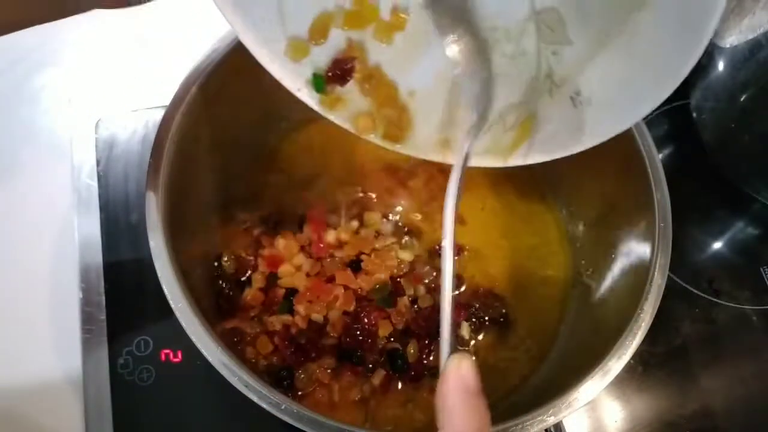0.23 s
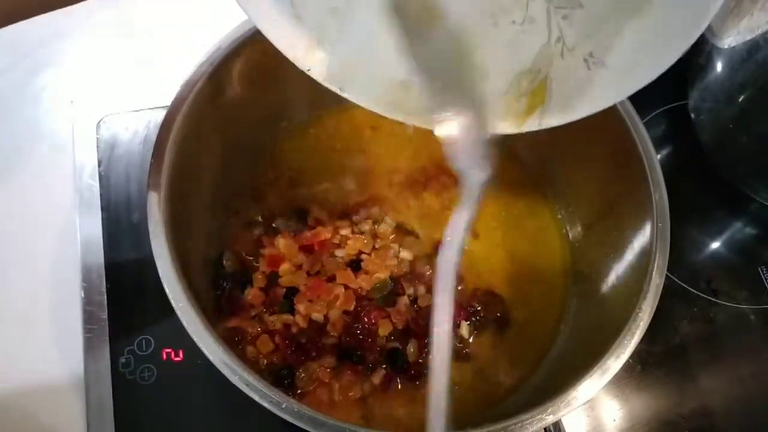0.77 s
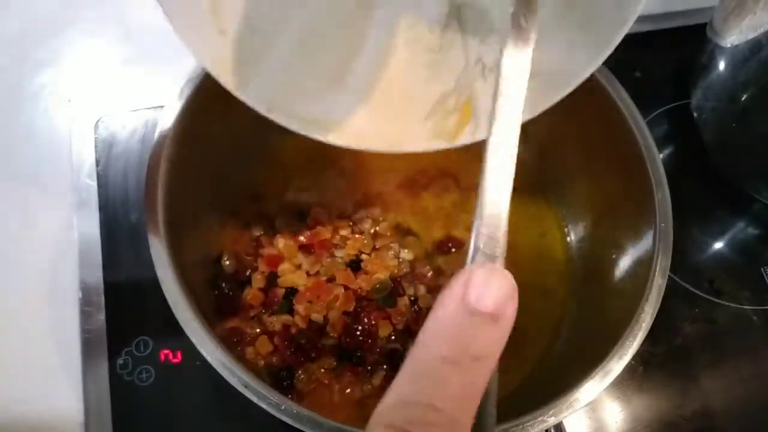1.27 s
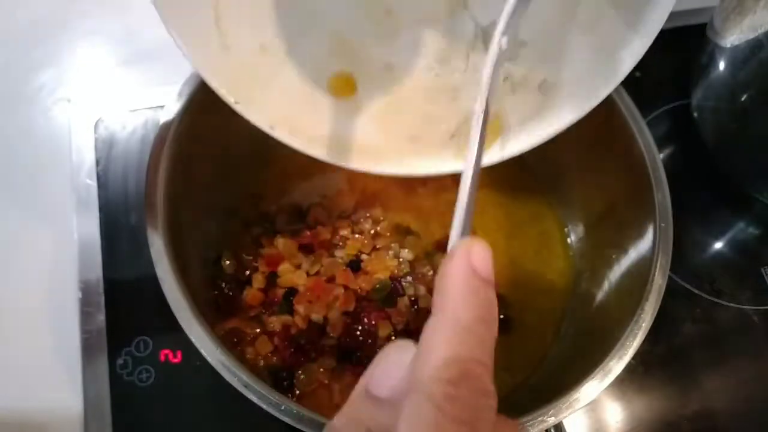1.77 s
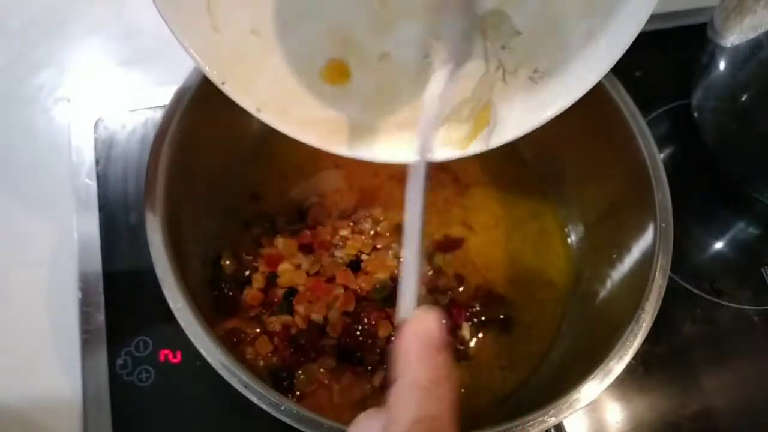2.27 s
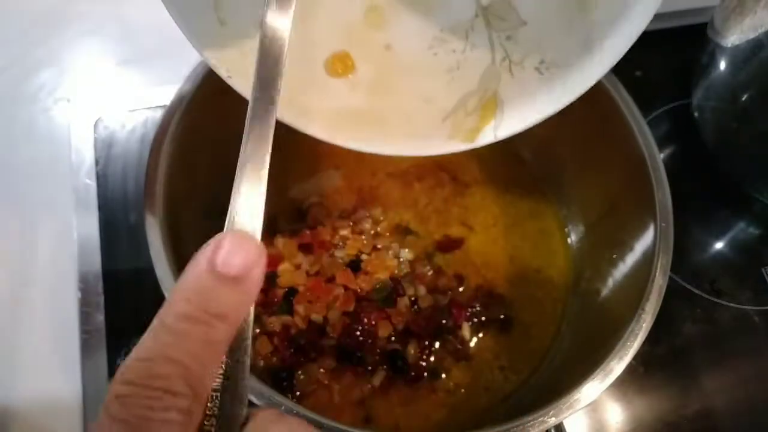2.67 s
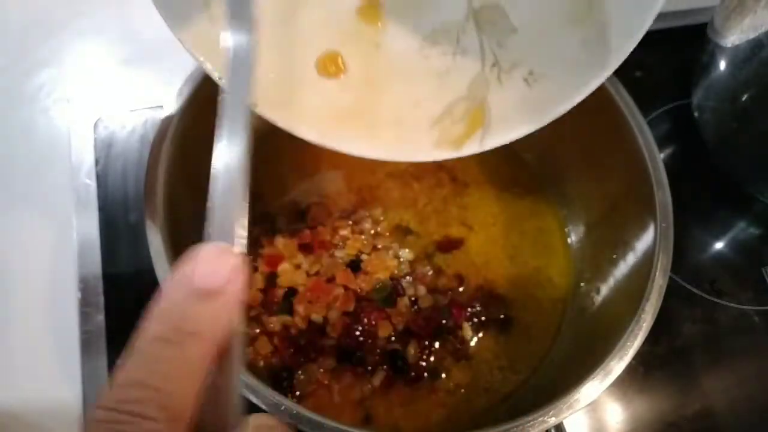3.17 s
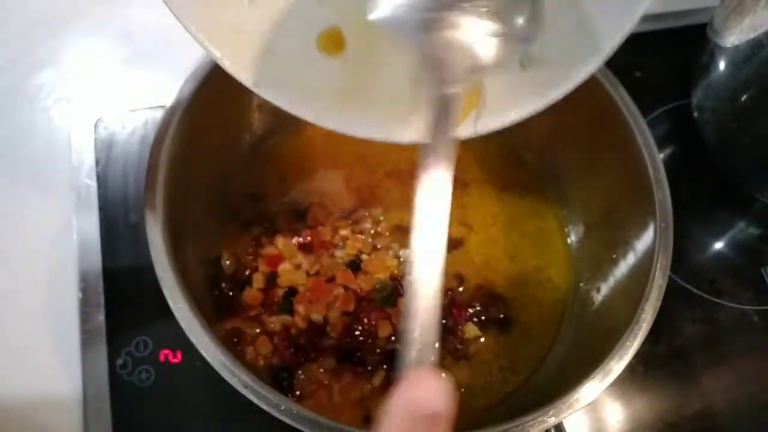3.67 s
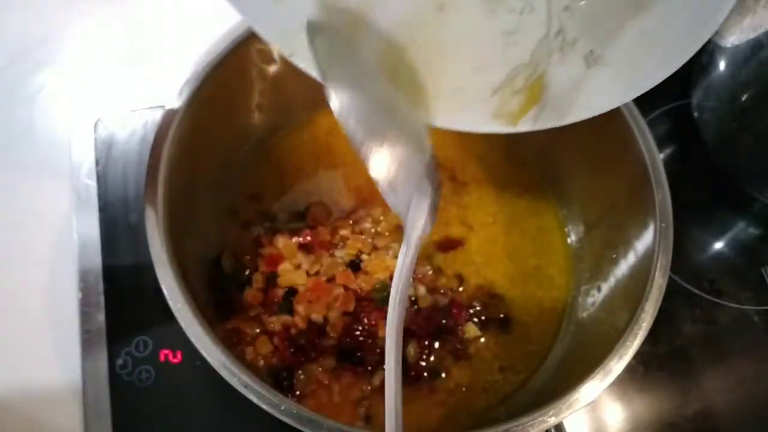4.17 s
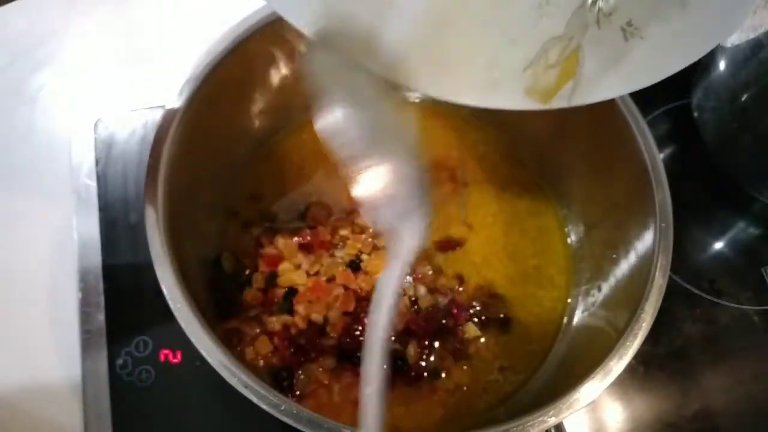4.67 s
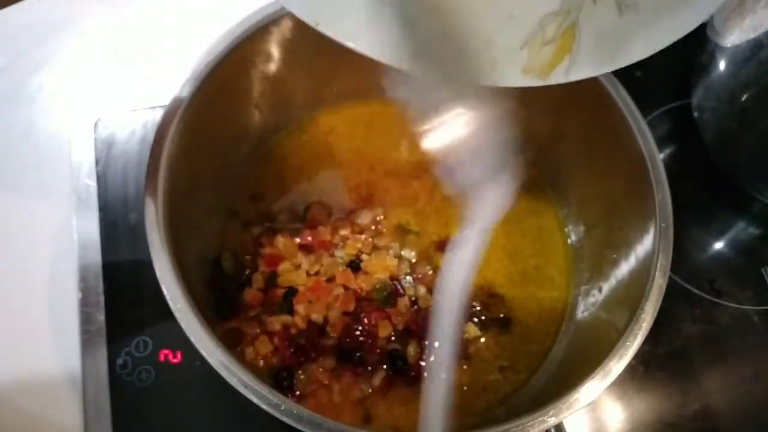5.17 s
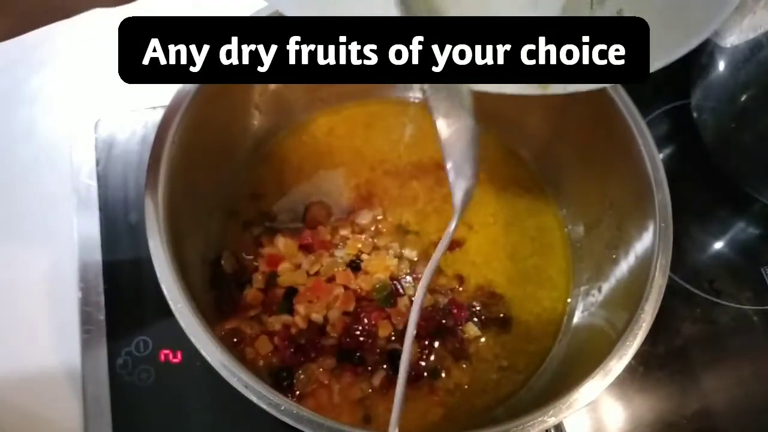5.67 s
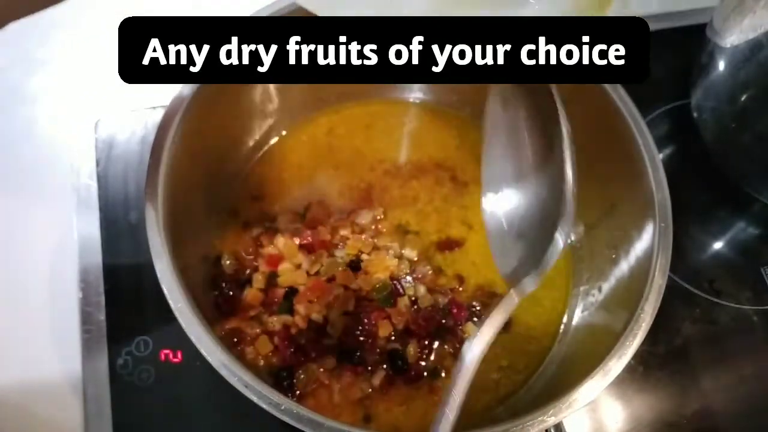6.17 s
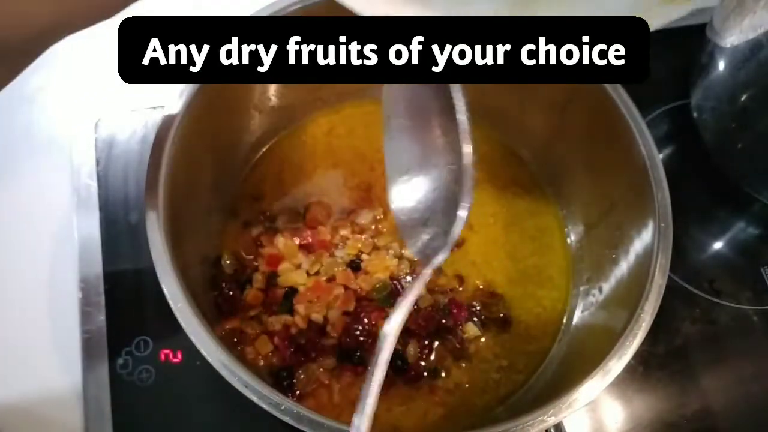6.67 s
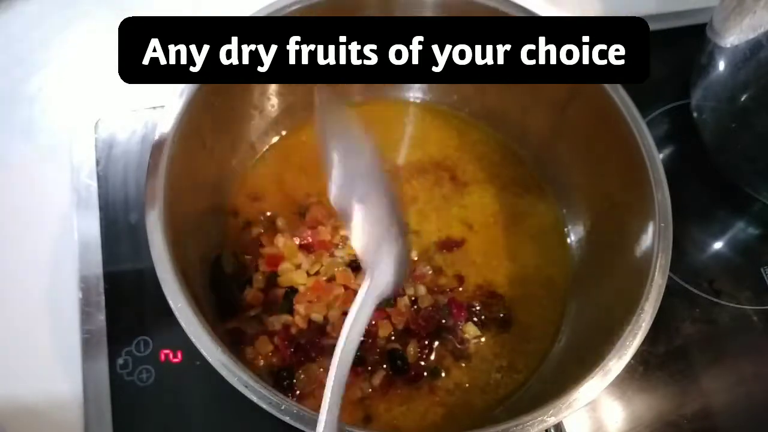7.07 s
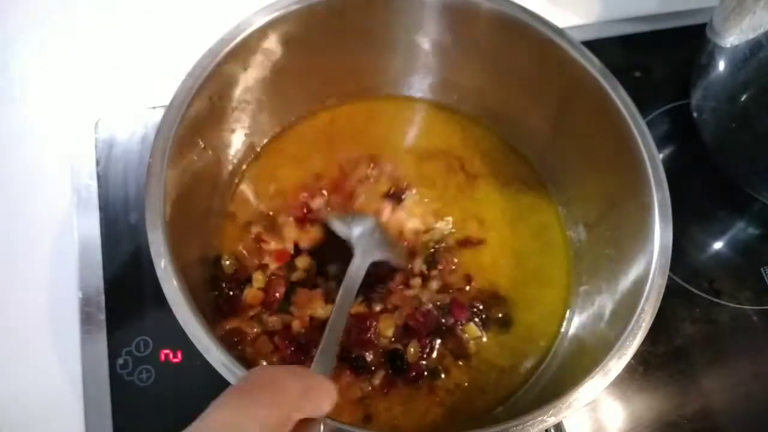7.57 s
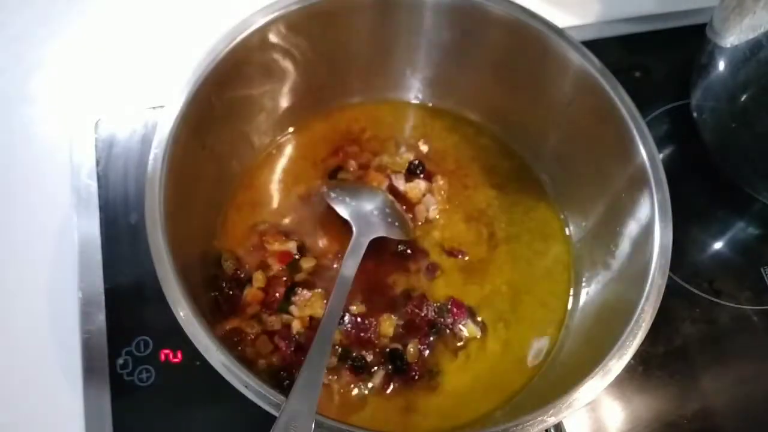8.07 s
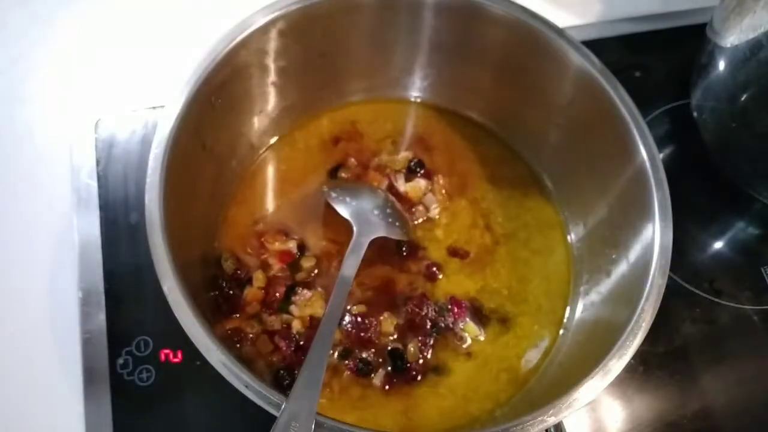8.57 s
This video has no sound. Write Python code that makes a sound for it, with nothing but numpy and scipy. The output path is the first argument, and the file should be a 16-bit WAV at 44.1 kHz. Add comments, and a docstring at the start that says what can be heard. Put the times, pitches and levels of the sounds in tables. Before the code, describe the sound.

A phone close to a stove picks up irregular spoon-on-bowl contacts: hard, short rim knocks, brighter tip clinks, quick rasping drags and tiny squeaks, with faint sticky fruit slips. Activity is busiest up to about four seconds, clusters again around five to six, then fades to faint drags. A single steel pan bump comes near the end, leaving only the soft fan rush in a lightly reverberant kitchen.

```python
"""Handle knocks on a bowl's rim stand out first, then tip clinks, short scrapes, squeaks and one pan bump.
A steel spoon scrapes dried fruit from a ceramic bowl into a saucepan, close under a phone in a small kitchen.
Contacts are cracks driving ringing modes; drags are trains of small slips; squeaks, thuds and hum are sines.
A noise tail makes the kitchen; shaped noise and wavering tones make the hob's fan, which runs throughout."""
import sys
import numpy as np
from scipy import signal
from scipy.fft import rfft, irfft
from scipy.io import wavfile
from scipy.ndimage import uniform_filter1d

SR = 44100
rng = np.random.default_rng(int(sys.argv[2]) if len(sys.argv) > 2 else 0)


def digitize_waveform(pressure):
    """Quantize a signal to 16-bit integers and store it at the path in sys.argv[1].

    Rows of a 2-D input are taken as channels; values are limited to [-1, 1].
    """
    field = np.atleast_2d(pressure).T
    bounded = np.clip(field, -1, 1)
    quanta = np.round(bounded * 32767).astype(np.int16)
    wavfile.write(sys.argv[1], SR, quanta)


N = 389401
TIME = np.arange(N) / SR


def undb(db):
    """Decibels to an amplitude factor."""
    return 10 ** (np.asarray(db) / 20)


def rms(x):
    """Effective level, kept just above zero."""
    return np.sqrt(np.mean(x ** 2) + 1e-20)


def read(points, hz):
    """A curve's value, on straight lines over log frequency."""
    f, v = np.transpose(points)
    return np.interp(np.log(np.maximum(hz, 1)), np.log(f), v)


def colour(x, points, size=4096):
    """Causal (minimum-phase) filter with the given (f/Hz, level/dB) response."""
    log_gain = np.log(undb(read(points, np.fft.rfftfreq(size, 1 / SR))))
    cepstrum = irfft(log_gain)
    # folding the cepstrum onto positive time makes the phase minimal
    cepstrum[1:size // 2] *= 2
    cepstrum[size // 2 + 1:] = 0
    response = irfft(np.exp(rfft(cepstrum)))
    return signal.fftconvolve(x, response[None], axes=-1)[:, :x.shape[-1]]


def band(x, lo, hi, order=4):
    """Band-pass between two frequencies in Hz."""
    sos = signal.butter(order, [lo, min(hi, .49 * SR)], "band", fs=SR, output="sos")
    return signal.sosfilt(sos, x)


def fade(t, t60):
    """Exponential decay that falls 60 dB in t60 seconds."""
    return undb(-60 * t / t60)


def walk(rate, count):
    """Smooth chance with a spread near 1, drawn anew about rate times a second."""
    hold = max(int(SR / rate), 1)
    steps = np.repeat(rng.standard_normal(count // hold + 1), hold)
    return uniform_filter1d(steps, hold)[:count] * np.sqrt(3 / 2)


def add(out, s, x):
    """Mix x into out from time s on."""
    i = max(int(s * SR), 0)
    out[:, i:i + x.shape[1]] += x[:, :N - i]


# The fan's rush of air: relative spectrum (f/Hz, level/dB)
FAN_AIR = [(20, 1.5), (45, -4), (75, -6.5), (105, -7.5), (135, -6.5), (200, -14.5), (270, -16.5),
           (500, -17), (800, -21), (1400, -28.5), (2400, -35), (3200, -49.5), (5000, -54.5), (16000, -55.5)]
# Faint steady tones of the fan (mean f/Hz, mean level/dB)
FAN_TONES = [(146, -72), (267, -74.5), (443, -78.5), (492, -80)]
# Swells of the hum (t/s of the crest, rise above rest level/dB)
HUM_SWELLS = [(0, 2.5), (2.8, 9.5), (7.9, 7.5)]
AIR_DB = -59.5
HUM_DB, HUM_SWELL_S = -66.5, 0.61  # level at rest, width of a swell


def fan(hum_hz=100, side=0.46, flutter_db=1.54):
    """Soft rush of shaped noise, a wavering hum that swells now and then, and a few faint tones."""
    left_right = np.array([[1], [-1]])
    air = colour(rng.standard_normal(N) + side * rng.standard_normal(N) * left_right, FAN_AIR)
    air *= undb(AIR_DB + flutter_db * walk(10, N)) / rms(air)
    hum_db = HUM_DB + sum(rise_db * np.exp(-((TIME - s) / HUM_SWELL_S) ** 2) for s, rise_db in HUM_SWELLS)
    for hz, db in [(hum_hz, hum_db)] + list(FAN_TONES):
        phase = 2 * np.pi * np.cumsum(hz + 4.1 * walk(12, N)) / SR
        air += np.sqrt(2) * undb(db + walk(7.3, N)) * np.sin(phase)
    return air


# Colour of the kitchen's answer (f/Hz, level/dB)
KITCHEN_COLOUR = [(100, -9), (400, -0.5), (900, -2), (2000, 0.5), (4000, 5), (7000, 5), (12500, 1),
                  (14000, -3), (16000, -7.5)]
# Reverberation of the kitchen (f/Hz, 60 dB decay/s)
KITCHEN_T60 = [(150, 0.99), (800, 0.6), (2500, 0.59), (7000, 0.5), (12000, 0.76), (16000, .4)]


def kitchen(x, wet_db=-11.0, early_db=-13, early_t60=0.09, likeness=0.74):
    """Near walls answer with sparse echoes over a diffuse tail whose octaves decay at their own rates."""
    t = np.arange(SR) / SR
    # a shared part makes the two sides alike
    noise = rng.standard_normal((2, SR)) + likeness * rng.standard_normal(SR)
    tail = 0
    for lo in 80 * 2. ** np.arange(8):
        tail = tail + band(noise, lo, 2 * lo, order=3) * fade(t, read(KITCHEN_T60, lo * np.sqrt(2)))
    tail *= np.clip(t / 0.0057, 0, 1)
    sparse = rng.standard_normal((2, SR)) * (rng.random(SR) < .03)
    early = sparse * fade(t, early_t60) * (t > .005)
    response = 0
    for db, part in ((wet_db, tail), (early_db, early)):
        response = response + undb(db) * part / np.sqrt(np.sum(part ** 2) / 2)
    return signal.fftconvolve(x, colour(response, KITCHEN_COLOUR), axes=-1)[:, :N]


# Jolts reaching the phone (t/s, left level/dB, right level/dB, decay constant/s)
JOLTS = [(5.2017, -17, -25, .024), (6.478, -39.5, -22.5, 0.046)]


def jolts(rise=0.00075):
    """A jolt is a slow push of pressure at one port and a pull at the other, which leaks away."""
    out = np.zeros((2, N))
    t = np.arange(SR // 2) / SR
    for s, left_db, right_db, decay in JOLTS:
        push_pull = np.array([[undb(left_db)], [-undb(right_db)]])
        add(out, s, push_pull * np.exp(-t / decay) * (1 - np.exp(-t / rise)))
    return out


# Dull thuds and low rings of pan, bowl and worktop (t/s, f/Hz, starting level/dB)
THUDS = [(0.248, 105, -43.5), (0.274, 76, -42), (.924, 518, -41.5), (4.791, 84, -41.5), (4.823, 70, -36),
         (7.66, 73, -36.5), (7.94, 118, -26), (7.985, 122.8, -33.5)]
# Damping of the thuds; the lowest die soonest (f/Hz, 60 dB decay/s)
THUD_T60 = [(70, 0.091), (120, 0.2), (525, 0.39)]
# every jolt comes with the same short knock
JOLT_KNOCK_HZ, JOLT_KNOCK_DB, JOLT_KNOCK_T60_S = 318, -31.5, 0.011


def thuds():
    """Low, quickly damped sine swings of pan, bowl and worktop, and the knock of each jolt."""
    out = np.zeros((2, N))
    t = np.arange(SR // 2) / SR
    swings = [(s, hz, db, read(THUD_T60, hz)) for s, hz, db in THUDS]
    swings += [(s, JOLT_KNOCK_HZ, JOLT_KNOCK_DB, JOLT_KNOCK_T60_S) for s, *_ in JOLTS]
    for s, hz, db, t60 in swings:
        add(out, s, undb(db) * np.sin(2 * np.pi * hz * t) * fade(t, t60) * np.ones((2, 1)))
    return out


# Body, middle and treble bands that carry a contact's level (low f/Hz, high f/Hz)
BAND_EDGES = [(300, 1400), (1400, 3000), (3000, 15000)]
# Corners of the correcting curve: end of body, both ends of middle, start of treble (f/Hz)
BAND_KNEES = [1200, 1650, 2700, 3400]


def voiced(x, length, body_db, mid_rel_db, treble_rel_db):
    """Force and hardness of a contact steer the level of its body, middle and treble."""
    head = x[:, :int(length * SR)]
    targets = (body_db, body_db + mid_rel_db, body_db + treble_rel_db)
    body, mid, treble = [db - 20 * np.log10(rms(band(head, *edges))) for db, edges in zip(targets, BAND_EDGES)]
    return colour(x, list(zip(BAND_KNEES, (body, mid, mid, treble))))


def blow(modes, crack, ring_db, crack_db, scatter_db, scatter_t60, ring_from_hz=3000,
         vary_db=2, detune=0.011, split=0.0046, twin=0.75):
    """One contact: a crack, its reflections inside the pan, and modes whose shares change with the spot struck."""
    t = np.arange(SR // 2) / SR
    scatter = rng.standard_normal((2, len(t))) + rng.standard_normal(len(t))
    scatter *= fade(t, scatter_t60) * (1 - fade(t, 0.016))
    push = undb(scatter_db) * scatter / np.sqrt(np.sum(scatter ** 2) / 2)
    push[:, 0] += 1  # the direct crack
    out = undb(crack_db) * colour(push, crack)
    for hz, db, t60 in modes:
        size, shift, skew, gap = rng.standard_normal(4)
        life = t[t < 2 * t60]
        # short-lived modes move with the grip; high ones reach the two ports out of step
        moved_hz = hz * (1 + detune * shift * min(1, 0.018 / t60))
        phase = 2 * np.pi * moved_hz * life + (hz > 3000) * skew * np.array([[1], [-1]])
        # bowl and pan are not quite round, so each mode is a beating pair
        pair = np.cos(phase) + twin * np.cos(phase * (1 + split * gap))
        strength = undb(db + vary_db * size + ring_db * (hz > ring_from_hz)) / np.sqrt(2)
        out[:, :len(life)] += strength * pair * fade(life, t60) * (1 - fade(life, 0.0013))
    return -out


def placed(x, lag_ms):
    """The farther port hears a contact later: the left for a positive lag, the right for a negative one."""
    shift = int(abs(lag_ms) * SR / 1000)
    return np.array([np.roll(x[0], shift * int(lag_ms >= 0)), np.roll(x[1], shift * int(lag_ms < 0))])


def stroke(t, length, edge):
    """Pressure rises, holds and lets go."""
    return np.clip(t / edge, 0, 1) * np.clip((length - t) / edge + 1 / 2, 0, 1)


# Modes of spoon tip and bowl (f/Hz, relative level/dB, 60 dB decay/s)
TIP_MODES = [(526, -14.5, 0.1), (830, 1.5, 0.01), (1300, -6.5, 0.023), (1750, -1.5, .03),
             (1900, -10, 0.021), (2500, -9.5, 0.019), (2315, -17, .65), (2385, -16, .35),
             (3640, -10.5, 0.12), (4170, -20, 0.27), (5140, -15, 0.052), (5400, -20.5, 0.052),
             (6850, -16, .12), (7270, -8, 0.047), (6870, -11, 0.06), (9290, -12.5, 0.11),
             (11500, -12.5, 0.031), (12560, -16, .04)]
# Spectrum of one small release in a drag (f/Hz, relative level/dB)
DRAG_COLOUR = [(100, -44), (420, -16), (650, 4), (900, 7.5), (1400, -2), (2400, -1.5), (3200, -14),
               (5200, -25.5), (7300, -18.5), (9000, -24.5), (12000, -20.5), (15500, -36.5)]


def drags(table, spread_db, chatter_db, grit, ring_db, smear_t60):
    """Stick and slip: a half-regular run of little releases, each ringing spoon and bowl."""
    out = np.zeros((2, N))
    t = np.arange(SR // 3) / SR
    for start, end, body_db, mid_db, treble_db, slip_hz, uneven in table:
        length = max(end - start, .01)
        cycles = np.cumsum(slip_hz * np.exp(uneven * walk(500, len(t)))) / SR
        sizes = undb(spread_db * np.clip(rng.standard_normal(len(t)), -2, 2))
        slips = np.diff(np.floor(cycles), prepend=0) * sizes
        pressure = stroke(t, length, 0.0015) * undb(chatter_db * walk(100, len(t)))
        # even slips sing, uneven ones rasp
        force = (slips + grit * uneven * rng.standard_normal(len(t))) * pressure
        body = blow(TIP_MODES, DRAG_COLOUR, ring_db, crack_db=41.5, scatter_db=1, scatter_t60=smear_t60)
        x = signal.fftconvolve(force[None], body, axes=-1)[:, :len(t)]
        add(out, start, voiced(x, length, body_db, mid_db, treble_db))
    return out


# Sticky fruit sliding and dropping (start t/s, end t/s, body level/dB, treble level re body/dB)
FRUIT_SLIDES = [(0.198, 0.238, -66.5, -7), (0.234, 0.29, -67, 5), (0.311, 0.37, -70.5, -7),
                (7.251, 7.291, -68.5, -2), (7.65, 7.7, -70, -10), (8.349, 8.368, -68.5, -26.5)]
# all fruit shares one mean slip rate and unevenness; its middle follows its treble (dB, dB per dB)
FRUIT_SLIP_HZ, FRUIT_UNEVEN, FRUIT_MID_DB, FRUIT_MID_PER_TREBLE = 172.2, 1, 1.5, 0.38


def fruit():
    """Sticky fruit peels off in slow, ragged slips that hardly ring the bowl."""
    slides = []
    for start, end, body_db, treble_db in FRUIT_SLIDES:
        mid_db = FRUIT_MID_DB + FRUIT_MID_PER_TREBLE * treble_db
        slides.append((start, end, body_db, mid_db, treble_db, FRUIT_SLIP_HZ, FRUIT_UNEVEN))
    return drags(slides, spread_db=5.0, chatter_db=4.0, grit=0.02018, ring_db=-20.5, smear_t60=0.01)


# Drags locking into a squeak (start t/s, end t/s, mean f/Hz, level/dB)
SQUEAKS = [(.005, 0.046, 1367, -42), (2.959, 2.982, 1369, -36.5), (2.982, 3.027, 1397, -54),
           (3.531, 3.577, 1371, -37.5), (3.583, 3.65, 1393, -52), (5.99, 6.03, 2725, -61),
           (6.858, 6.93, 1740, -64.5), (7.0, 7.067, 2330, -62)]
# a firm squeak is nearly clean; the lighter the pressure, the rougher it gets
FIRM_SQUEAK_DB, SQUEAK_ROUGH, SQUEAK_ROUGH_PER_DB = -37, 0.13, 0.0271


def squeaks(second_db=-19, waver=0.015, rasp=0.12):
    """The slips lock to one resonance of the spoon: a short, unsteady tone with its octave."""
    out = np.zeros((2, N))
    t = np.arange(SR // 8) / SR
    for start, end, hz, db in SQUEAKS:
        rough = SQUEAK_ROUGH + SQUEAK_ROUGH_PER_DB * max(FIRM_SQUEAK_DB - db, 0)
        pitch = hz * (1 + waver * walk(88.5, len(t)) + rasp * rough * walk(700, len(t)))
        phase = 2 * np.pi * np.cumsum(pitch) / SR
        tone = np.sin(phase) + undb(second_db) * np.sin(2 * phase)
        tone *= np.sqrt(2) * undb(db) * stroke(t, end - start, .008) * (1 + rough * walk(400, len(t)))
        add(out, start, np.array([tone, tone]))
    return out


# Spoon dragged over the glaze (start t/s, end t/s, body level/dB, treble level re body/dB,
# central slip rate f/Hz, unevenness 0-1)
SCRAPES = [(0.005, 0.04, -45, -9, 869, 0.27), (0.065, 0.149, -59.5, -6.5, 833, 0.25),
           (0.597, 0.614, -59, -10, 960, 0.61), (1.564, 1.626, -54, -4.5, 1097, 0.1),
           (1.643, 1.668, -31, -11, 860, 0.29), (2.94, 3.037, -52, -24, 1074, 0.12),
           (3.569, 3.614, -38, -14, 866, .3), (3.613, 3.657, -39, -21, 1106, .3),
           (4.069, 4.09, -45, -16.5, 875, 0.06), (4.111, 4.191, -55.5, -10.5, 728, 0.12),
           (4.355, 4.388, -68, 0, 778, .5), (4.42, 4.445, -59.5, -8, 892, 0.56),
           (5.645, 5.702, -39, -6.5, 856.4, 0.1), (6.005, 6.037, -51.5, -24.5, 870, 0.12),
           (6.85, 6.943, -63.5, -10, 898, 0.21), (6.988, 7.049, -54.5, -14.5, 955, 0.17)]
# middle level re body for even slips, and the rise at full unevenness
SCRAPE_MID_DB, SCRAPE_RASP_DB = -10, 25.5


def scrapes():
    """The spoon drags over the glaze; the more uneven its slips, the more it rasps."""
    strokes = []
    for start, end, body_db, treble_db, slip_hz, uneven in SCRAPES:
        mid_db = SCRAPE_MID_DB + SCRAPE_RASP_DB * uneven
        strokes.append((start, end, body_db, mid_db, treble_db, slip_hz, uneven))
    return drags(strokes, spread_db=2, chatter_db=2.0, grit=0.38, ring_db=0, smear_t60=0.0078)


# Modes of the saucepan (f/Hz, relative level/dB, 60 dB decay/s)
PAN_MODES = [(740, -12, .1), (832, -12, .35), (1200, -3, .12), (1330, -9, .07), (1540, -6, .1),
             (1740, -3, .1), (2020, -1, .09), (2440, -7, .22), (2540, -8, .2), (3645, -17, .11),
             (3955, -19, .11), (4220, -20, .1), (5020, -18, .11), (5950, -22, .09), (6360, -21, .07),
             (7210, -16, .06), (7350, -17, .07), (7560, -17, .06), (7780, -18, .06), (8000, -18, .06),
             (8300, -20, .06)]
# Crack spectrum shared by pan bump and tip clinks (f/Hz, relative level/dB)
TIP_CRACK = [(60, -16.5), (200, -13.5), (400, -7), (750, 3.5), (1400, -3.5), (2400, 2.5), (3100, -9.5),
             (5200, -22), (7300, -15.5), (8600, -24.5), (12000, -21), (15500, -37)]
BUMP_S, BUMP_DB = 7.9397, (-33, 4.5, -6)  # body level, then middle and treble re body
BUMP_NOTE_HZ, BUMP_LAG_MS, BUMP_RING_DB = 1805, 0.35, 0.5


def bump():
    """The pan bumps on the hob and its steel wall rings."""
    out = np.zeros((2, N))
    modes = list(PAN_MODES) + [(BUMP_NOTE_HZ, 4, .064)]
    x = blow(modes, TIP_CRACK, BUMP_RING_DB, crack_db=11, scatter_db=17.5, scatter_t60=0.45)
    add(out, BUMP_S, placed(voiced(x, 0.024, *BUMP_DB), BUMP_LAG_MS))
    return out


MEDIUM_BLOW_DB = -35  # stronger blows than this set the high modes ringing more
# Spoon tip against the bowl (t/s, body level/dB, treble level re body/dB, lag/ms: left late if positive)
CLINKS = [(0.7014, -59, -13, 0.052), (0.9225, -31.5, -11.5, -0.2), (0.9588, -43, 6.5, -0.066),
          (1.4603, -36.5, -4.5, 0.28), (1.6309, -40, -7, 0.2), (1.9606, -36, -7, 0.16),
          (4.7597, -40.5, -7, -0.1), (4.7931, -46, -0.3, -0.021), (4.849, -45, 4, -0.027),
          (5.1978, -39, 4.5, -0.14), (5.585, -33, -9.5, .27), (5.9036, -63.5, -5, -0.075),
          (6.0359, -55.5, -7, 0.066), (6.1332, -66.5, -7.5, 0.012), (6.4804, -38.5, 4.5, -0.1),
          (6.9448, -49, -4.5, 0.092)]
TIP_NOTE_HZ = 2338
# high ringing at a medium blow (dB) and its rise per dB of strength
TIP_RING_DB, TIP_RING_SLOPE = 0.5, 0.2
# a harder touch lifts the middle along with the treble: dB at even treble, dB per dB of treble
TIP_MID_DB, TIP_MID_PER_TREBLE = 5, .4


def clinks():
    """The tip clinks here and there on the bowl; a harder touch is brighter."""
    out = np.zeros((2, N))
    modes = list(TIP_MODES) + [(TIP_NOTE_HZ, -2, .05)]
    for s, body_db, treble_db, lag_ms in CLINKS:
        ring_db = TIP_RING_DB + TIP_RING_SLOPE * (body_db - MEDIUM_BLOW_DB)
        mid_db = TIP_MID_DB + TIP_MID_PER_TREBLE * treble_db
        x = blow(modes, TIP_CRACK, ring_db, crack_db=28, scatter_db=10, scatter_t60=0.03, ring_from_hz=2200)
        add(out, s, placed(voiced(x, 0.028, body_db, mid_db, treble_db), lag_ms))
    return out


# Spoon handle on the bowl's rim (t/s, body level/dB, middle level re body/dB, treble level re body/dB)
KNOCKS = [(0.3823, -23.5, -2, -21.5), (0.3906, -30, -3.5, -11.5), (0.5202, -47.5, 4, -5.5),
          (2.1154, -19.5, -10.5, -8.5), (2.1972, -28, -2.5, -14), (2.2027, -27.5, -8.5, -25.5),
          (2.3874, -24.5, -12, -9), (2.808, -33, -2, -20), (3.3631, -27.5, -0.3, -10.5),
          (3.945, -26.5, -4, -17.5), (4.0198, -38.5, -6, -13)]
# Modes of handle and rim (f/Hz, relative level/dB, 60 dB decay/s)
RIM_MODES = [(351, -20, 0.034), (624, -19, .02), (912, 4.5, 0.044), (1010, 6.5, 0.0073), (1107, -13, .05),
             (1360, -14.5, 0.044), (1670, -4, 0.034), (1900, -13.5, .05), (2170, -26, 0.036),
             (2400, -17, .02), (3745, -28, .3), (3790, -19, .09), (3700, -24, .12), (6516, -19, .1),
             (6580, -8, 0.015), (6860, -31, .3), (6800, -26.5, 0.13), (7000, -27, .1), (7186, -25, 0.18),
             (10180, -28, 0.19), (10686, -26, 0.12), (12040, -14, 0.065)]
# Spectrum of the rim's contact crack (f/Hz, relative level/dB)
RIM_CRACK = [(60, -24), (200, -11.5), (480, -8), (850, 9.5), (1300, -2.5), (2200, -6), (3100, -25.5),
             (5000, -35), (7000, -32.5), (8800, -29.5), (12000, -35.5), (15500, -35)]
# the handle always meets the rim at about the same spot, so note and lag stay put
RIM_NOTE_HZ, RIM_LAG_MS = 1840, .12
# high ringing at a medium blow (dB) and its rise per dB of strength
RIM_RING_DB, RIM_RING_SLOPE = -10.5, .85


def knocks():
    """The handle knocks on the rim; strong knocks make the bowl ring."""
    out = np.zeros((2, N))
    modes = list(RIM_MODES) + [(RIM_NOTE_HZ, -11.5, .03)]
    for s, body_db, mid_db, treble_db in KNOCKS:
        ring_db = RIM_RING_DB + RIM_RING_SLOPE * (body_db - MEDIUM_BLOW_DB)
        x = blow(modes, RIM_CRACK, ring_db, crack_db=36.5, scatter_db=1.0, scatter_t60=0.039, ring_from_hz=5000)
        add(out, s, placed(voiced(x, 0.028, body_db, mid_db, treble_db), RIM_LAG_MS))
    return out


# Colour of the left microphone port (f/Hz, level/dB)
LEFT_PORT = [(100, -2.5), (300, -1.5), (700, -1.5), (1200, -1.5), (2200, 1), (3200, -6), (5000, 3),
             (7000, 2), (8800, -0.5), (10500, -9.5), (12500, -12.5)]
# Colour of the right microphone port (f/Hz, level/dB)
RIGHT_PORT = [(100, -2.5), (300, 5), (700, -2), (1200, 2.5), (2200, -1), (3200, -5), (5000, 1), (7000, -7),
              (8800, -3), (10500, 4.5), (12500, -2)]


def scene():
    """Spoon, bowl and pan in the kitchen, heard through two ports, over jolts and the hob's fan."""
    near = thuds() + fruit() + squeaks() + scrapes() + bump() + clinks() + knocks()
    heard = near + kitchen(near)
    ports = np.vstack([colour(heard[:1], LEFT_PORT), colour(heard[1:], RIGHT_PORT)])
    return fan() + jolts() + ports


def record(dry, gate_db=-76, split_hz=3000, top_hz=16000):
    """The phone's noise suppressor turns the treble down once it is faint; the very top is cut."""
    low = signal.sosfiltfilt(signal.butter(8, split_hz, fs=SR, output="sos"), dry)
    treble = dry - low
    treble_power = np.maximum(uniform_filter1d(np.mean(treble ** 2, axis=0), size=1024), 0)
    power = treble_power / undb(gate_db) ** 2
    opening = .25 + .75 * power ** 2 / (1 + power ** 2)  # never below a quarter
    top_cut = signal.ellip(8, .2, 70, top_hz, fs=SR, output="sos")
    return signal.sosfilt(top_cut, low + opening * treble)


dry = scene()
out = record(dry)
digitize_waveform(out)
```